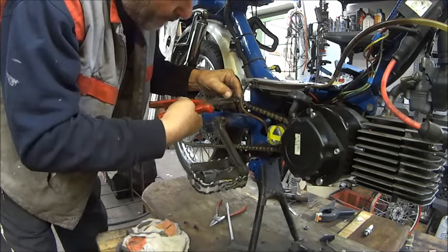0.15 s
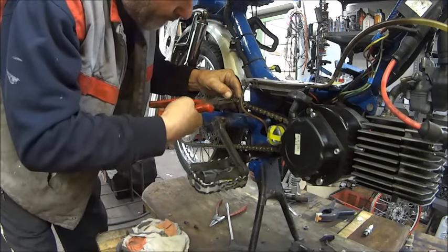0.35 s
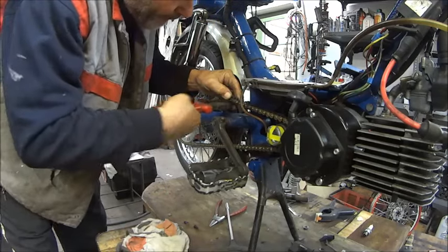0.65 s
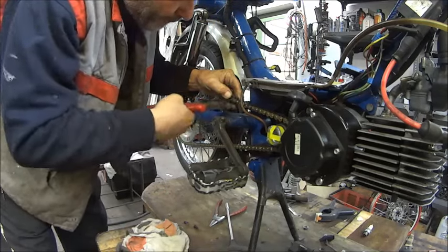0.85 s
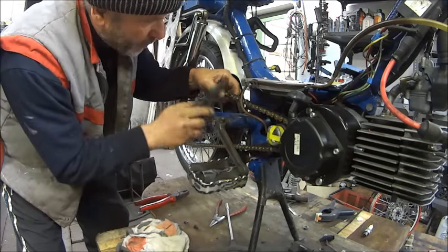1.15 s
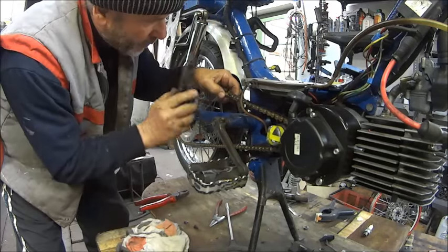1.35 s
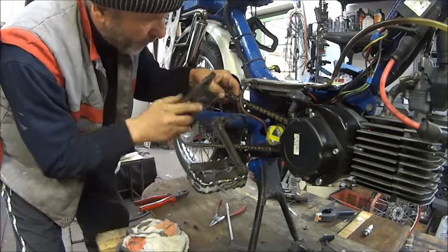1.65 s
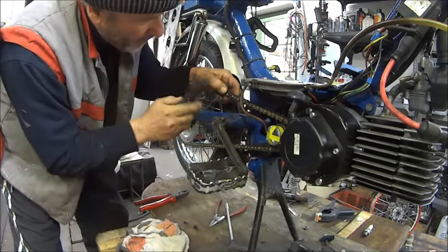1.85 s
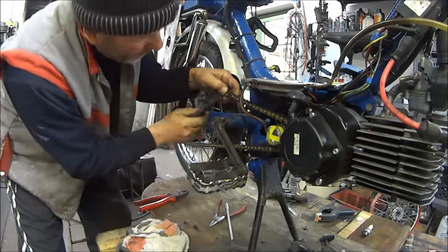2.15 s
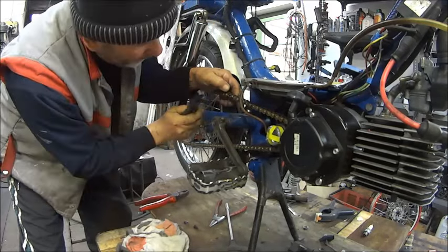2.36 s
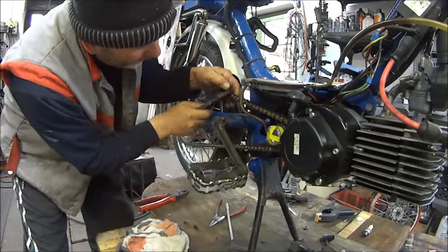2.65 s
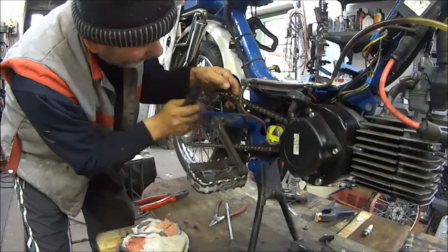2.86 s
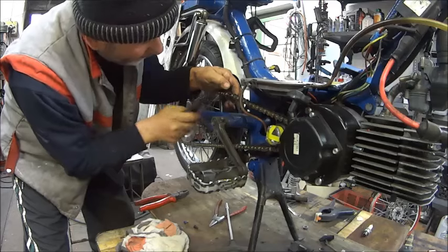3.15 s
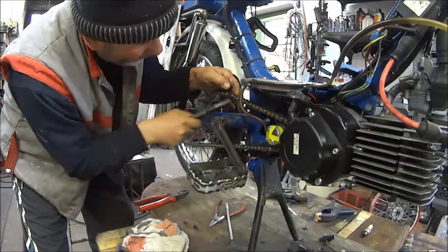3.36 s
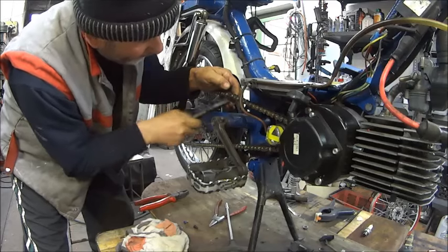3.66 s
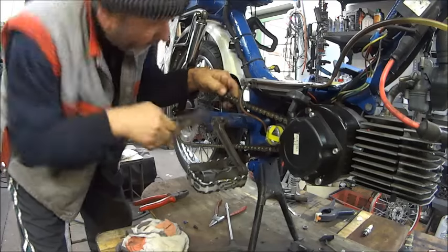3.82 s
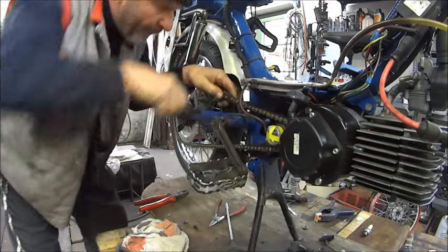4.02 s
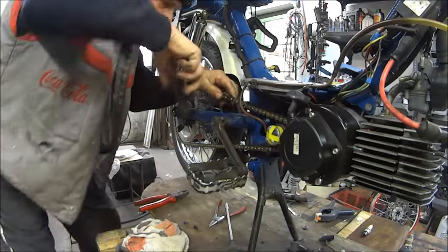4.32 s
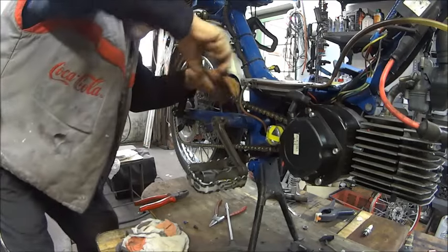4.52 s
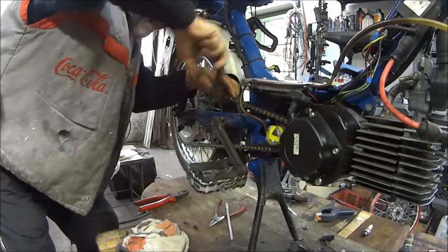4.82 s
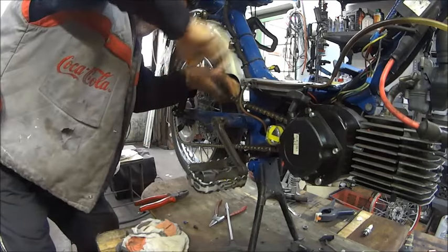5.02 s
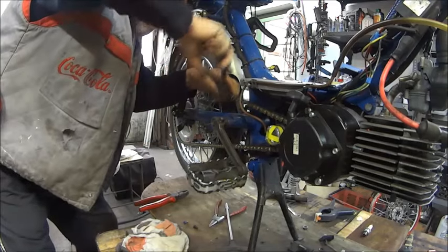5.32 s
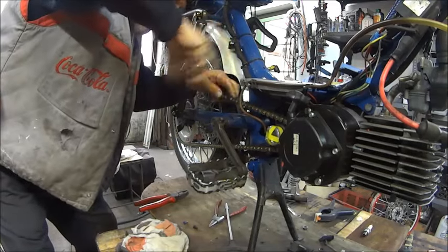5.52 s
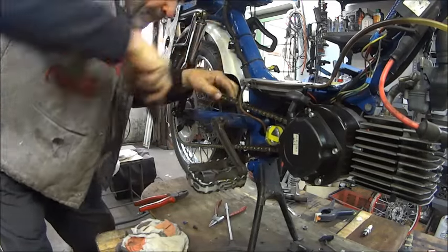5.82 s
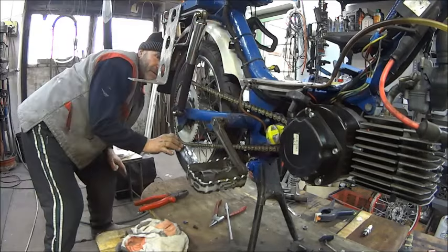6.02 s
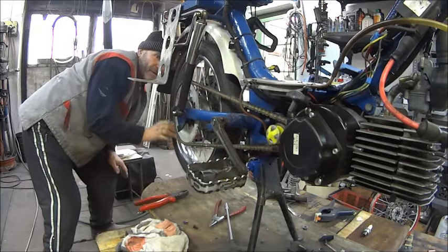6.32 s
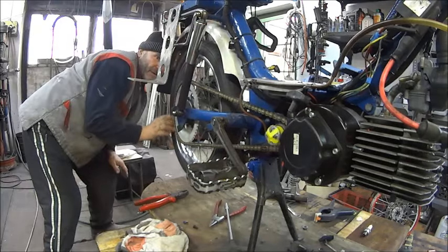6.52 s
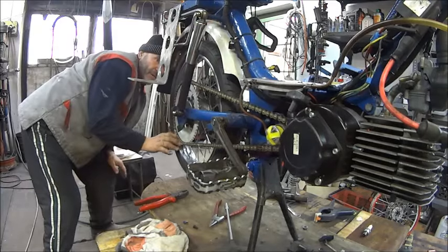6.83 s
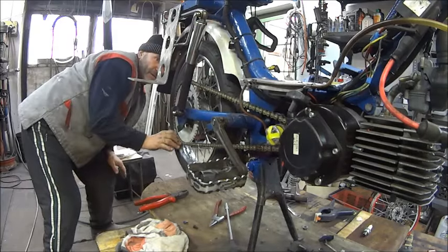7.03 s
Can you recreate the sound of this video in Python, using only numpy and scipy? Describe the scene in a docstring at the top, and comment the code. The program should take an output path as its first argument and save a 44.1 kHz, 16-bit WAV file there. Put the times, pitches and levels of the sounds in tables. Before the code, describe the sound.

In a workshop, pliers hit a slack steel chain close to the microphone, slightly to the right. Dry bright cracks come singly, then in a quicker run, each with clinking links, a low frame clank and a short rattling fade. The ringing stops abruptly at a jump in time; then a wheel turns with thin link clicks and soft hollow knocks. Faint rustle and steady wide hiss lie beneath.

```python
"""In a workshop, pliers tap the steel drive chain of a motorcycle on its stand, off to the right.
Each tap is a noise crack with clinking links, a ringing frame and a fading noise after-sound.
After a jump in time the wheel is turned: links click over the sprocket as short noise bursts
and the hub knocks dully in low noise. Sleeves rustle in tiny grains, single parts tink as lone
modes, and a steady hiss of shaped noise lies underneath."""
import sys
import numpy as np
from scipy import signal
from scipy.fft import rfft, irfft
from scipy.io import wavfile
from scipy.ndimage import uniform_filter1d

SR = 44100
rng = np.random.default_rng(int(sys.argv[2]) if len(sys.argv) > 2 else 0)


def to_wav(sig):
    """Store sig (one row per channel, or 1-D mono) as 16-bit WAV at the path in sys.argv[1].

    Samples outside -1..1 are clipped; the rate is SR.
    """
    pcm = np.clip(np.atleast_2d(sig), -1, 1) * 32767
    pcm = np.round(pcm).astype(np.int16)
    wavfile.write(sys.argv[1], SR, pcm.T)  # frames by channels


N = 316638
T = np.arange(N) / SR

# blows on the chain: (time [s], crack level [dB], dullness [dB], skid [ms], stand thump [dB],
# frame clank [dB], shake of the links [dB], strongest clink [dB], pitch of that clink [Hz])
TAPS = [(0.442, -24.5, -5.5, 5.5, -51.5, -55, -71, -30, 6330),
        (0.5035, -15, -11.5, 2.1, -45.5, -38.5, -55, -45, 10100),
        (0.5226, -13.5, -1.5, 2.4, -40, -43.5, -43, -28.5, 2090),
        (0.968, -29.5, 2, 1.35, -53, -46.5, -57.5, -41, 1470),
        (1.0798, -8, -4, 0.61, -32.5, -35.5, -30.5, -22.5, 4840),
        (1.4711, -7.5, -9.5, 1.9, -32, -50, -28.5, -18, 9200),
        (2.6181, -9.5, -29, 2, -35.5, -36, -32.5, -18.5, 5400),
        (3.0492, -6, -29, 0.54, -36, -32.5, -31, -14, 10700),
        (3.3432, -11, -14.5, 1.6, -35.5, -28.5, -28, -18.5, 8800),
        (3.6327, -8.5, -12, 0.88, -33, -31.5, -30, -16, 7550),
        (4.5065, -8, -7, 3.7, -33.5, -45, -32, -16.5, 6300),
        (4.5555, -12.5, -2.5, 3.9, -69, -39, -59, -26.5, 3475),
        (4.7987, -12.5, -6, 1.8, -31, -36.5, -33, -17.5, 10630),
        (5.0673, -6.5, -17.5, 2.3, -32.5, -36.5, -29, -16.5, 8200),
        (5.124, -23, -5, 2.1, -52, -35.5, -60, -34, 6350),
        (5.332, -7.5, -7, 2.1, -32.5, -29, -31, -17.5, 5500),
        (5.5746, -11.5, -28, 0.66, -31.5, -29.5, -27, -26.5, 5470)]
# the frame rocks back on its stand: (time [s], thump level [dB])
NUDGES = [(1.788, -46), (2.808, -82), (4.159, -58.5), (5.789, -48)]
# moments when the pliers are left ringing: (time [s], level [dB])
PLIER_RINGS = [(3.345, -56), (4.557, -48), (4.80, -45), (5.07, -44), (5.333, -54)]
# single links and jaws clicking: (time [s], crack level [dB], dullness [dB],
# shake of the links [dB], pitch of the strongest clink [Hz])
CLICKS = [(0.0776, -46.5, -13, -78, 10000), (0.1624, -47.5, 15, -84, 1790), (0.436, -32.5, 2, -45.5, 7500),
          (0.455, -47, -6, -73, 7500), (0.507, -24, -2, -47, 9550), (0.636, -54, -5, -80, 10000),
          (0.8075, -54, -22, -78, 9000), (2.0686, -66, 9, -68, 3500), (2.611, -48, 9.5, -77, 1470),
          (3.9926, -48.5, -1, -64, 7000), (4.073, -46, -2, -75, 4530), (4.096, -46.5, -9, -78, 9000),
          (4.1322, -47, -10, -77, 6380), (4.8037, -19, -11.5, -32, 8000), (6.2131, -29.5, -12, -48.5, 6900),
          (6.2918, -24.5, -16, -49.5, 10630), (6.379, -56, 9, -62, 2090), (6.3985, -25.5, -22, -50, 10100),
          (6.4502, -25, -19, -47.5, 5530), (6.5848, -29, -23, -51, 6380), (6.7426, -25.5, -18, -52.5, 9600)]
# dull knocks of the turning wheel: (time [s], thud level [dB], tick level [dB])
KNOCKS = [(6.215, -41, -39), (6.236, -32.5, -31), (6.297, -35, -39.5), (6.323, -30, -38), (6.358, -37, -41),
          (6.382, -36, -36.5), (6.404, -44, -43), (6.432, -31, -40), (6.472, -36.5, -43),
          (6.497, -36, -39.5), (6.548, -44, -43.5), (6.582, -33, -47), (7.146, -31.5, -44.5)]
# faint pitched tinks of single parts: (time [s], level [dB], pitch [Hz], 60 dB fade [s])
TINKS = [(0.4396, -23.5, 2390, 0.016), (.443, -30.5, 3700, 0.02), (.466, -60, 6030, 0.066),
         (2.806, -59, 1400, 0.081), (5.292, -52, 1430, 0.1), (5.795, -55, 1425, 0.18),
         (5.91, -57, 2183, 0.093), (6.746, -50, 4700, 0.12)]
# sleeves and slack links rustling: (start [s], length [s], level [dB])
RUSTLES = [(1.802, 0.37, -61), (3.837, 0.44, -62.5), (5.768, 0.15, -57), (6.2, 0.25, -72),
           (7.08, 0.11, -61)]

# ringing modes of the stand: (pitch [Hz], level [dB], 60 dB fade [s], starting direction [+1 or -1])
STAND_MODES = [(43.74, -22, 2.34, 1), (84.3, -27, 1.6, -1), (94.5, -17, 0.87, 1), (129.9, -16.5, 1.15, -1),
               (152.96, -6, 0.71, 1), (156.37, -2, 0.72, 1), (177.9, -16, 0.87, -1), (207.7, -12, 0.63, 1)]
# ringing modes of the frame: (pitch [Hz], level [dB], 60 dB fade [s])
FRAME_MODES = [(234.7, -16.5, 0.57), (309.5, -21.5, 0.97), (340, -27, 0.64), (371, -14.5, 0.41),
               (442.6, -14.5, 0.69), (588, -14, 0.48), (768, -26.5, 0.32), (1254, -20, 0.45)]
# ringing modes of the pliers: (pitch [Hz], level [dB], 60 dB fade [s])
PLIER_MODES = [(2568, 0, .5), (2810, -6, .45), (3714, -12, .4), (4452, -12, .4)]
# resonances of the links: (pitch [Hz], width [Hz], 60 dB fade of the tail [s])
LINK_MODES = [(1493, 370, 0.4), (2123, 510, 0.27), (3450, 480, 0.24), (5175, 560, 0.27), (6296, 910, 0.132),
              (8730, 580, 0.31), (10700, 2500, 0.21)]
# how readily each link resonance speaks, in the order of LINK_MODES: (level [dB])
LINK_EASE = [-0.5, -1.5, -10.5, -6, -5.5, -6.5, -4]
# after-sound of shaken links and walls: (frequency [Hz], relative level [dB per Hz],
# 60 dB fade [s], rise [ms], left-right likeness [-1 to 1])
AFTER_SOUND = [(65, 2.5, 0.89, 170, 0.3), (148, 5, 0.76, 36, 0.19), (420, 9.5, 0.59, 51, 0.14),
               (955, 5, 0.46, 12.8, 0.42), (2690, 4.5, 0.42, 1.9, 0.13), (5900, 2.5, 0.37, 1.1, 0.56),
               (10900, 3.5, 0.3, 0.98, 0.76)]
# colour of the steady hiss: (frequency [Hz], relative level [dB per Hz])
AIR_COLOUR = [(12, -37), (20, -10), (239, -8), (295, -8), (764, -5), (827, -7.5), (1230, -5), (1440, -8.5),
              (2790, -13), (11000, -21.5), (14300, -55), (22000, -120)]
# how alike the hiss is on both sides: (frequency [Hz], left-right likeness [-1 to 1])
AIR_ALIKE = [(60, 1), (130, 0.51), (270, 0.032), (570, -0.5), (1210, -0.67), (2580, -0.42), (5460, 0.063),
             (11600, 0.79)]
# balance of the work between the sides: (frequency [Hz], left minus right [dB])
LEAN = [(60, 0.5), (110, -4), (190, -0.5), (350, -3.5), (620, -0.5), (1120, -3), (2000, -2), (3600, -0.5),
        (6460, -0.5), (11600, -0.5)]

JUMP_S = 5.97  # taps and their ringing are silent from here on
MID_DB, LOW_DB = 2, -3  # tap crack at 3-5 kHz and 1-3 kHz, added to the dullness
NUDGE_CLANK_DB = -2  # frame clank of a nudge, compared with its thump
LINK_TAIL_DB = -12  # slow tail of a clink
CLINK_DB_PER_OCT, CLINK_SCATTER_DB = 11, 2.5  # loss away from the strongest pitch; random spread
AFTER_TILT_DB, TILT_PER_DULL = -0.45, 0.071  # per octave; a dull blow leaves a darker after-sound
CHATTER_DB = 2.5  # size of the level jumps in the after-sound
AFTER_BANDS_HZ = 30 * 2 ** np.arange(0, 9.1, .5)  # half-octave steps
CLICK_FALL_MS, CLICK_CLINK_DB = 3.8, -8
RUSTLE_RISE_S, RUSTLE_FALL_S, RUSTLE_PATCHY_DB = 0.026, 0.093, 2
AIR_DB = -61.5
TOP_EDGE_HZ = 11300


def taps():
    """Pliers hit the chain: cracks, ringing metal, clinks and after-sound, cut at the jump in time."""
    s, db, dull, skid, thump, clank, shake, clink, pitch = np.transpose(TAPS)
    nudge_s, nudge_db = np.transpose(NUDGES)
    push_s = np.r_[s, nudge_s]
    stand = ring(push_s, np.r_[thump, nudge_db], STAND_MODES,
                 push_ms=8, scatter_db=1.6, rough=.4, phase_spread=.35)
    frame = ring(push_s, np.r_[clank, nudge_db + NUDGE_CLANK_DB], FRAME_MODES,
                 push_ms=11.0, scatter_db=3.0, rough=0.84, phase_spread=1.62)
    pliers = ring(*np.transpose(PLIER_RINGS), PLIER_MODES,
                  push_ms=70, scatter_db=1, rough=.25, phase_spread=2)
    sound = cracks(s, db, dull + MID_DB, dull + LOW_DB, 1.0, skid)
    sound += stand + frame + pliers
    sound += links(s, clink, clinks(pitch))
    sound += after(s, shake, AFTER_TILT_DB - TILT_PER_DULL * dull)
    return sound * np.clip((JUMP_S - T) / 0.011, 0, 1)


def cracks(s, db, mid_db, low_db, rise_ms, fall_ms):
    """Steel on steel: one sharp snap, then a few milliseconds of micro-impacts, as noise in three bands."""
    out = np.zeros((2, N))
    lead = 400  # samples ahead of the blow
    t_ms = np.arange(-lead, 1600) / SR * 1000
    edges_hz = ((6360, 11300), (3480, 5540), (717, 3120))
    for k in range(len(s)):
        before = 0.16 * np.exp(t_ms / rise_ms)
        skid = 1.36 * np.exp(-t_ms / max(fall_ms[k], .3))
        snap = 0.63 * np.exp(-np.abs(t_ms) / 0.22)
        shape = np.where(t_ms < 0, before, skid + snap)
        # one shared noise plus a little of its own on each side
        grit = rng.standard_normal((3, len(t_ms))) * shape
        grit = grit[0] + 0.069 * grit[1:]
        burst = 0
        for gain_db, (lo, hi) in zip((0, mid_db[k], low_db[k]), edges_hz):
            part = band(grit, lo, hi)
            burst = burst + undb(gain_db) * part / np.abs(part).max()
        i = int(s[k] * SR) - lead
        out[:, i:i + len(t_ms)] += burst * undb(db[k])
    return out


def ring(s, db, modes, push_ms, scatter_db, rough, phase_spread):
    """Each blow shares its push anew among the modes; loose joints make the rings waver on each side."""
    out = np.zeros((2, N))
    push = np.hanning(int(push_ms * SR / 1000) + 3)
    step = 600  # samples between the random points of the waver
    for hz, mode_db, t60, *way in modes:
        luck = rng.standard_normal((len(s), 2))
        size = undb(db + mode_db + scatter_db * luck[:, 0]) * np.exp(1j * phase_spread * luck[:, 1])
        # each ring starts afresh at its blow
        size *= np.sign(way or 1) * np.exp(-2j * np.pi * hz * s)
        swell = signal.fftconvolve(fade(spikes(s, size), t60), push / push.sum())[:N]
        held = rng.standard_normal((3, N // step + 2, 2)) @ [1, 1j]
        sides = held[0] + .4 * held[1:]
        waver = np.array([np.interp(np.arange(N) / step, np.arange(len(h)), h) for h in sides])
        out += (swell * (1 + rough * waver) * np.exp(2j * np.pi * hz * T)).imag
    return out


def links(s, db, shares_db):
    """Close link modes blur together: a narrow noisy clink at each blow, with a slow tail."""
    out = 0
    for share_db, (hz, width, t60) in zip(shares_db, LINK_MODES):
        hits = spikes(s, undb(db + share_db))
        shape = undb(0.5) * fade(hits, 0.011).real + undb(LINK_TAIL_DB) * fade(hits, t60).real
        noise = rng.standard_normal(N) + 0.45 * rng.standard_normal((2, N))
        noise = band(noise, hz - width / 2, hz + width / 2)
        out = out + shape * noise / noise.std()
    return out


def clinks(pitch_hz):
    """Share of each link resonance [dB]: favours the pitch of the struck spot, with random scatter."""
    away_oct = np.abs(np.log2(np.array(LINK_MODES)[:, :1] / pitch_hz))
    scatter = CLINK_SCATTER_DB * rng.standard_normal(away_oct.shape)
    return np.array(LINK_EASE)[:, None] - CLINK_DB_PER_OCT * away_oct + scatter


def after(s, db, tilt_db):
    """Shaken links and walls: noise bands, each swelling and dying at its own pace after every blow."""
    out = 0
    hz = np.fft.rfftfreq(N, 1 / SR) + 1
    noise = pair(along(hz, AFTER_SOUND, 4)) * undb(along(hz, AFTER_SOUND, 1))
    for centre in AFTER_BANDS_HZ:
        window = np.cos(np.pi / 2 * np.clip(2 * np.log2(hz / centre), -1, 1)) ** 2
        part = irfft(noise * window, N)
        hits = spikes(s, undb(2 * (db + tilt_db * np.log2(centre / 4000))))
        # half the fade time, as this is power and the root is taken below
        power = fade(hits, along(centre, AFTER_SOUND, 2) / 2).real
        rise = along(centre, AFTER_SOUND, 3) * SR / 1000
        power = uniform_filter1d(power, int(rise) | 1, origin=int(rise / 2))
        # slack links chatter: the level jumps every few milliseconds
        chatter = uneven(200) * (centre > 600)
        out = out + part * np.sqrt(np.maximum(power, 0)) * undb(CHATTER_DB * chatter)
    return out * np.sqrt(N) / 2


def clicks():
    """Light contacts of links and jaws: thin, bright, too weak to shake the frame."""
    s, db, dull, shake, pitch = np.transpose(CLICKS)
    sound = cracks(s, db, 0.25 * dull - 5.5, dull, .7, np.full(len(s), CLICK_FALL_MS))
    sound += links(s, db + CLICK_CLINK_DB, clinks(pitch))
    return sound + after(s, shake, -.25 * dull - 1)


def knocks():
    """Soft bumps of the turning wheel: short noise in a hollow low band and a crisp tick above."""
    s, thud_db, tick_db = np.transpose(KNOCKS)
    noise = rng.standard_normal(N) + 0.44 * rng.standard_normal((2, N))
    thuds = band(noise * fade(spikes(s, undb(thud_db)), 0.29).real, 164, 392)
    hits = spikes(s, undb(tick_db))
    ticks = noise * (fade(hits, .04) + .35 * fade(hits, .2)).real
    # filtered twice for steeper edges
    ticks = band(band(ticks, 600, 2200), 600, 2200)
    return thuds + ticks


def tinks():
    """Single parts ring faintly, each as one short lone mode."""
    out = 0
    for s, db, hz, t60 in TINKS:
        out = out + ring(np.array([s]), db, [(hz, 0, t60)],
                         push_ms=6.3, scatter_db=3.0, rough=0.5, phase_spread=0)
    return out


def rustle():
    """Sleeves and slack links: dense tiny grains, a few much larger, in spells that rise, hold and fall."""
    gain = 0
    for s, length, db in RUSTLES:
        rise = (T - s) / RUSTLE_RISE_S
        fall = 1 + (s + length - T) / RUSTLE_FALL_S
        gain = gain + undb(db) * np.clip(np.minimum(rise, fall), 0, 1)
    patchy = undb(RUSTLE_PATCHY_DB * uneven(2000))
    grains = (rng.random((2, N)) < .08) * rng.standard_normal((2, N))
    grains = grains * undb(1.2 * rng.exponential(size=N))
    grains = band(grains[0] + 1.8 * grains, 470, 11800)
    return gain * patchy * grains / grains.std()


def air():
    """Steady hiss of the room and microphone: shaped noise, very wide in the middle range."""
    hz = np.fft.rfftfreq(N, 1 / SR) + 1
    hiss = irfft(pair(along(hz, AIR_ALIKE, 1)) * undb(along(hz, AIR_COLOUR, 1)), N)
    return undb(AIR_DB) * hiss / hiss.mean(axis=0).std()


def undb(db):
    """Turn decibels into a plain multiplier."""
    return 10 ** (np.asarray(db) / 20)


def along(hz, table, col):
    """Read a column of a table at any frequency, on a log-frequency axis."""
    rows = np.array(table, float)
    return np.interp(np.log(hz), np.log(rows[:, 0]), rows[:, col])


def band(x, lo, hi):
    """Keep only the sound between two frequencies [Hz]."""
    return signal.sosfilt(signal.butter(2, [lo, hi], "band", fs=SR, output="sos"), x)


def pair(alike):
    """Spectra of left and right noise: a shared part, and a part that is opposite on the two sides."""
    alike = np.clip(alike, -.95, .99)
    mid, side = rng.standard_normal((2, N // 2 + 1, 2)) @ [1, 1j]
    return np.sqrt(1 + alike) * mid + np.sqrt(1 - alike) * side * np.array([[1], [-1]])


def spikes(s, size):
    """One-sample spikes at the given times [s]."""
    out = np.zeros(N, np.asarray(size).dtype)
    np.add.at(out, (np.asarray(s) * SR).astype(int), size)
    return out


def fade(x, t60):
    """Let every spike die away smoothly, by 60 dB in t60 seconds."""
    return signal.lfilter([1], [1, -np.exp(-np.log(1000) / (t60 * SR))], x)


def uneven(hold):
    """Random steps held for some samples, with softened edges."""
    steps = np.repeat(rng.standard_normal(N // hold + 1), hold)[:N]
    return uniform_filter1d(steps, size=hold // 2)


def scene():
    """All the work leans to the right; the hiss is added beneath it."""
    work = taps() + clicks() + knocks() + tinks() + rustle()
    # the work is off to the right; the camera body shades the left microphone
    lean_db = along(np.fft.rfftfreq(N, 1 / SR) + 1, LEAN, 1) * np.array([[.5], [-.5]])
    return irfft(rfft(work) * undb(lean_db), N) + air()


def record(dry):
    """The camera cuts the top; the steep cut adds no delay, so sharp clicks ring faintly ahead."""
    soft_cut = signal.butter(8, 14500, fs=SR, output="sos")
    steep_cut = signal.cheby2(12, 19, TOP_EDGE_HZ, fs=SR, output="sos")
    # run forwards and backwards, which cancels the delay
    return signal.sosfiltfilt(steep_cut, signal.sosfilt(soft_cut, dry))


dry = scene()
out = record(dry)
to_wav(out)
```